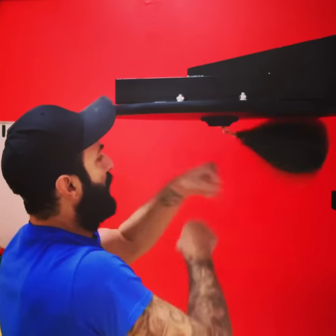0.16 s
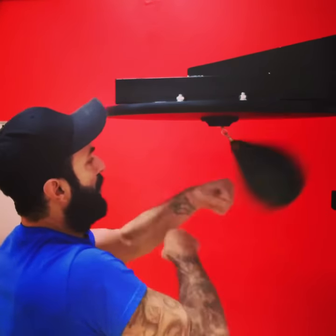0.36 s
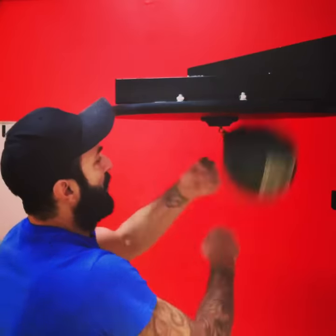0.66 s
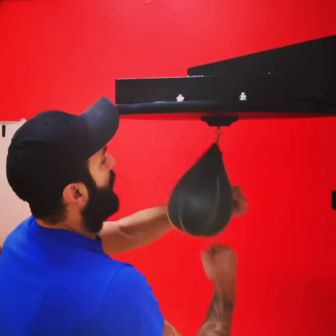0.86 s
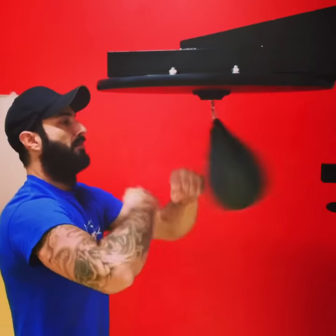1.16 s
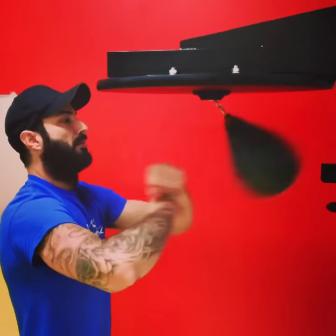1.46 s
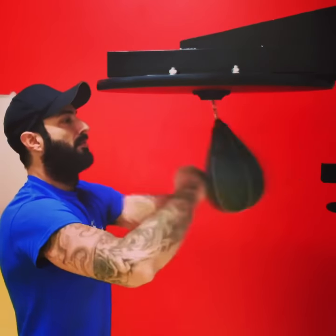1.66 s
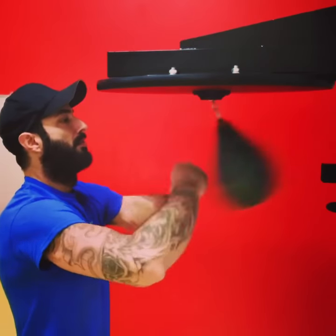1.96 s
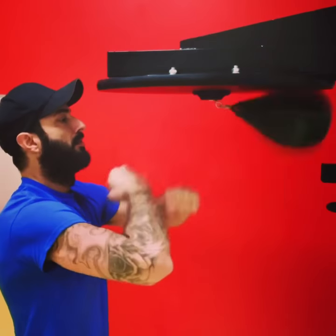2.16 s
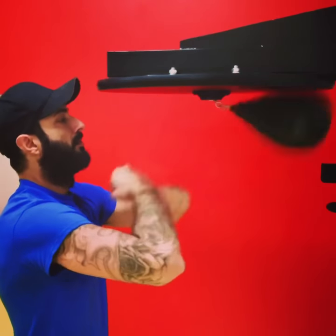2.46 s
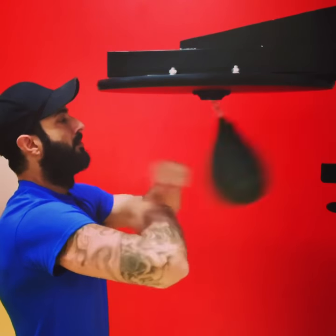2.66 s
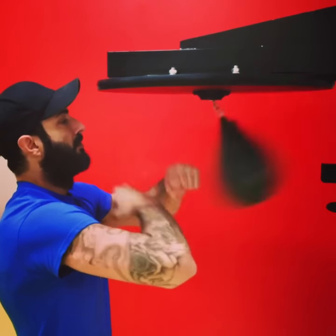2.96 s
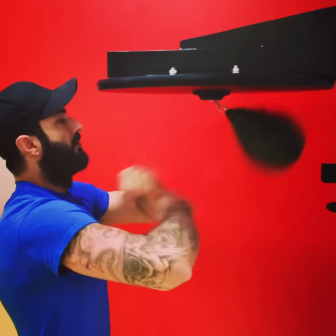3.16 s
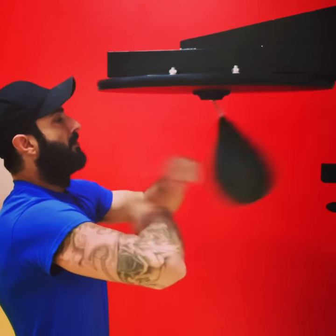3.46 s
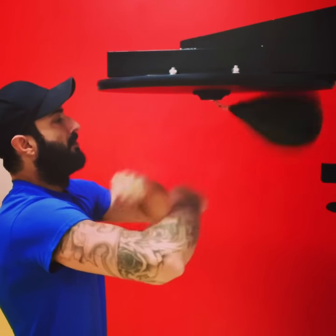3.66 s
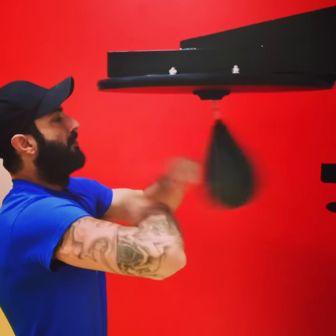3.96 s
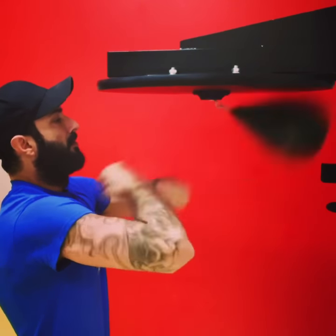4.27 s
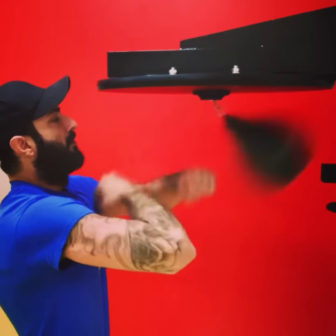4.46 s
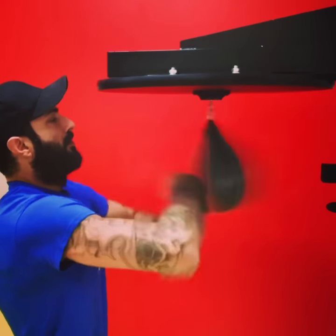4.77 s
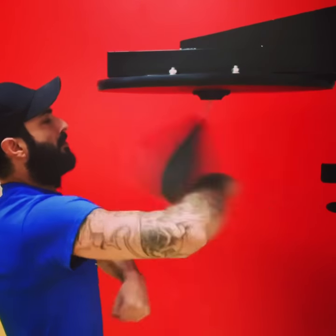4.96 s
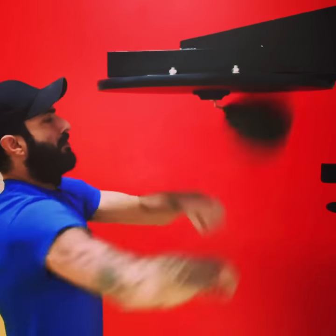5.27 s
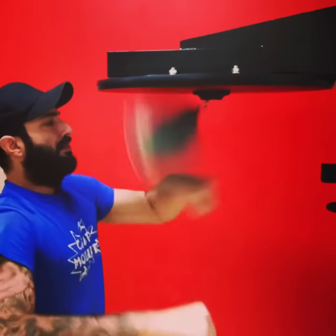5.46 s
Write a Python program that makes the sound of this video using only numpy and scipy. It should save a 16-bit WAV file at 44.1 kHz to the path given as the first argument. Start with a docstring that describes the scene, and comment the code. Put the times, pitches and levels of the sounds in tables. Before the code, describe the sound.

Rapid rolling speed bag workout: sharp fist slaps alternate with woody board cracks, clattering hardware and low platform booms, growing quicker and louder.

```python
"""In a small gym, a leather speed bag is punched in a quickening roll under a wall-mounted platform. A fist
meets the bag about halfway between rebounds, with a slap, a knock and a push through the swivel. On the board
the bag gives a noise-burst crack, a damped knock, a thud and a decaying noise clatter, and excites the low
modes of the platform. Snap, clatter and boom follow the boxer's effort. A bracket clangs once at the start, and
now and then a brief high ring sounds."""
import sys
import numpy as np
from scipy import signal
from scipy.fft import rfft, irfft, next_fast_len
from scipy.io import wavfile

SR = 44100
rng = np.random.default_rng(int(sys.argv[2]) if len(sys.argv) > 2 else 0)


def persist_wave(psi):
    """Save psi, clipped to +-1, as 16-bit WAV."""
    counts = np.round(np.clip(psi, -1, 1) * 32767).astype(np.int16)
    wavfile.write(sys.argv[1], SR, np.atleast_2d(counts).T)


N = 247401
LEAD = 4410  # samples of run-in before time zero
SPAN = next_fast_len(N + LEAD + SR // 2)

# drive on the bag, which sags, then builds as the roll quickens: (time [s], level [dB])
EFFORT = [(0, 1.5), (0.35, -5), (1.2, -9), (2.1, -3.5), (3.3, -2), (4.1, 2.5), (4.45, -1), (5.6, 7)]
# bag meets board: (time [s], clatter accent over effort [dB], extra leather snap, high when flat [dB],
# weight of the boom over effort [dB], strength of the knock [dB])
REBOUNDS = [(-0.02, -0.5, 0, -6.5, -9), (0.0768, -2, 3.5, -1, -12), (0.308, -3.5, -0.5, -8.5, -8),
            (0.4343, 0, 3.5, 1, -15), (0.5849, -3.5, -17, 1, -14), (0.699, 1, 7.5, 3.5, -6),
            (0.848, -2, -39, -5, -21), (1.011, -2, -15, -1, -14), (1.195, 1, 6, 0, -6.5),
            (1.363, 1, 5, 0.5, -7.5), (1.5304, -4.5, -2, 3.5, -6), (1.6821, 2, -1, 1.5, -8),
            (1.8281, 2, 9, 2.5, -9), (1.9735, 2.5, 0, -0.5, -3.5), (2.125, 1, 9, 1, -7.5),
            (2.2683, -4.5, -3, 3, -2.5), (2.416, 2, -9, -0.5, 1), (2.5615, 0, 4, -0.5, 0.5),
            (2.7, -4, -10, 2.5, 0), (2.8292, 2, 9.5, 1.5, 3.5), (2.9646, -1, -4, 2.5, 3.5),
            (3.1, 1, 5.5, 2, -1.5), (3.2357, 3.5, -5, -0.5, -4.5), (3.3631, -1, 7, -2.5, -1.5),
            (3.4901, 1, 9.5, 2, 0), (3.619, 0.5, -3, -4.5, 5.5), (3.7449, -2.5, -8, 1, -3.5),
            (3.8666, 1, 3.5, 1, 3), (3.9791, 2, 5.5, 1.5, 5), (4.0953, 1.5, 6.5, 1, 3.5),
            (4.2139, 3, 6.5, 3, -1), (4.337, -2, 2.5, 0.5, 2), (4.4456, 4, 4, 4.5, 1.5),
            (4.5524, 2.5, 5, 0.5, 1), (4.652, -3.5, -1.5, 3, -1), (4.7597, 4, 2, 2.5, -8),
            (4.859, 0.5, 1, -2.5, 0), (4.954, 4.5, 6, 2.5, 4.5), (5.0496, -1, 0, 0, -7),
            (5.1383, -2, -5, 3.5, 3), (5.2324, -3, 2, -3.5, 2.5), (5.3393, -6.5, 2, -10.5, 1),
            (5.4351, 0, -2, 2, -7), (5.5313, -4.5, 2, -3, -10)]
# fist meets bag, squarely or with a light touch: (time [s], slap level [dB])
PUNCHES = [(0.1909, 17.5), (0.3781, 11), (0.6489, 8.5), (0.795, 13.5), (0.9311, 17), (1.1082, 12),
           (1.291, 10.5), (1.457, 11.5), (1.6172, 13.5), (1.7651, 12), (1.9049, 19), (2.0575, 10),
           (2.203, 19.5), (2.3462, 12), (2.4936, 20), (2.6366, 16), (2.769, 17.5), (2.9021, 12.5),
           (3.035, 17.5), (3.1743, 12.5), (3.3004, 9), (3.4349, 13.5), (3.5603, 18), (3.6899, 12),
           (3.8113, 14), (3.93, 11), (4.0426, 14), (4.1557, 16.5), (4.277, 8), (4.397, 10), (4.4979, 11),
           (4.6092, 18.5), (4.7194, 21), (4.9171, 19.5), (5.1029, 21), (5.189, 24.5), (5.4009, 21.5),
           (5.5891, 23.5)]
# brief rings near 1.6 kHz after some blows: (time [s], level [dB])
RINGS = [(1.342, -22), (3.1, -13), (4.608, -11.5)]

# spectrum of the leather on the board: (frequency [Hz], gain [dB])
SNAP_SPECTRUM = [(1000, -53), (4000, 1), (7000, -4.5), (9500, 11.5), (14500, -1.5)]
# spectrum of the fist on the leather: (frequency [Hz], gain [dB])
SLAP_SPECTRUM = [(300, -27), (1500, -8), (2600, -29.5), (6500, -24), (9500, -14), (14500, -16.5),
                 (16500, -29)]
# spectrum of the rattling rig: (frequency [Hz], gain [dB])
CLATTER_SPECTRUM = [(25, -9), (60, 21), (200, 4.5), (330, 10), (480, 2), (1000, 0), (2600, -5.5),
                    (6000, -6), (8500, -20.5), (14000, -8), (16500, -29)]
# share of the clatter that repeats from rebound to rebound: (frequency [Hz], share [0-1])
REPEATED_SHARE = [(100, 0.22), (600, 0.81), (4000, 0.95), (12000, 0.07)]
# room reverberation: (frequency [Hz], 60 dB decay time [s])
ROOM_T60 = [(300, 1), (1000, 0.77), (15000, 0.37)]

# ringing of the taut bag: (frequency [Hz], level [dB], 60 dB decay time [s])
BAG_MODES = [(545, -13, 0.028), (1493, -2, 0.0078), (3720, -7.5, 0.0067)]
# woody resonances of the board: (frequency [Hz], gain [dB])
BOARD_RESONANCES = [(538, 0), (770, 1), (913.7, 1.5), (1085, -1), (1374, -1.5), (1705, 2), (2880, -19)]
# low modes of platform, bracket and wall: (frequency [Hz], 60 dB decay time [s], signed coupling [ratio])
PLATFORM_MODES = [(63.3, 0.13, -1.48), (75.5, 0.42, 1), (94.17, 1, 0.4), (116.7, 0.63, 0.64),
                  (138.1, 0.22, -0.89), (147.1, 0.47, -0.22), (225.6, 0.91, 0.15), (254, 0.35, -0.13),
                  (287.3, 0.59, -0.21), (323.7, 0.83, 0.2), (334.3, 0.95, -0.15), (361, 0.82, 0.13)]
# modes of the bracket: (frequency [Hz], level [dB], 60 dB decay time [s])
BRACKET_MODES = [(322, 4.5, 0.22), (880, -3, 0.2), (1060, 0, 0.19), (2160, -5.5, 0.13)]

# microphone pair, balance: (frequency [Hz], left minus right [dB])
PORT_BALANCE = [(60, 4), (130, 0), (380, 0), (600, -8), (950, -9), (1600, -5), (2400, 0)]
# microphone pair, correlation: (frequency [Hz], likeness [0-1])
PORT_LIKENESS = [(600, 0.83), (1100, 0.0059), (6500, 0.1), (8200, 0.98)]
# microphone pair, phase: (frequency [Hz], lead of left over right [rad])
PORT_PHASE = [(40, -.2), (130, -.55), (300, -1.1), (700, -2.6), (6500, -7.6), (9500, -9.5), (14000, -12.6)]

# levels at an effort of 0 dB, before each rebound's own offset
SNAP_DB, CLATTER_DB, BOOM_DB = -3.5, -16, -18
# a punch's knock and push grow with effort [dB per dB] up to this effort [dB], then level off
FULL_EFFORT_DB, GROWTH_PER_EFFORT = 1.2, 1.14
# reference level of all knocks, and of a punch's push at full effort
KNOCK_DB, SWIVEL_PUSH_DB = -7, -12
# knuckle knock against the slap [dB]; push per slap [dB per dB]
KNUCKLE_DB, PUSH_PER_SLAP = -24, 0.092
KNOCK_ROUGHNESS = 0.45  # energy share of leather flutter in a knock
WOOD_Q = 79
ECHO_S = 0.0043
# delay and pitch of the thud; its levels against the boom strength of board and fist
THUD_LAG_S, THUD_HZ, BOARD_THUD_DB, FIST_THUD_DB = 0.00951, 307, -2.5, -7.5
CLANG_DB = -21.5
RING_HZ, RING_DECAY_S, RING_RISE_S = 1640, 0.003, 0.00045
CUTOFF_HZ = 16300


def from_db(db):
    """Amplitude ratio: 20 dB is a factor of ten."""
    return 10 ** (np.asarray(db) / 20)


def at_hz(points, hz):
    """Interpolation along a logarithmic frequency axis."""
    f, value = np.transpose(points)
    return np.interp(np.log(np.maximum(hz, 1)), np.log(f), value)


def filtered(x, response):
    """Linear filtering: the spectrum is multiplied by a response given as a function of Hz."""
    size = next_fast_len(x.shape[-1])
    spectrum = rfft(x, size) * response(np.fft.rfftfreq(size, 1 / SR))
    return irfft(spectrum, size)[..., :x.shape[-1]]


def pair(a, b):
    """Partial coherence: mid and side mixtures of two unrelated signals set the likeness of left and right."""
    def likeness(hz):
        return np.clip(at_hz(PORT_LIKENESS, hz), 0, 1)
    mid = filtered(a, lambda hz: np.sqrt((1 + likeness(hz)) / 2))
    side = filtered(b, lambda hz: np.sqrt((1 - likeness(hz)) / 2))
    return np.array([mid + side, mid - side])


def placed(times, gains, shapes):
    """Superposition: one scaled shape per event is added on the time line."""
    out = np.zeros(SPAN)
    for s, gain, shape in zip(times, gains, shapes):
        start = LEAD + round(s * SR)
        out[start:start + len(shape)] += gain * shape[:SPAN - start]
    return out


def effort_db(times):
    """Linear interpolation of the drive level in time."""
    return np.interp(times, *np.transpose(EFFORT))


def rebounds():
    """Snap, clatter and boom scale with the drive; rows of (time, snap dB, knock dB, clatter dB, boom dB)."""
    s, accent_db, flat_db, weight_db, knock_db = np.transpose(REBOUNDS)
    drive_db = effort_db(s)
    snap_db = SNAP_DB + drive_db + flat_db
    clatter_db = CLATTER_DB + drive_db + accent_db
    boom_db = BOOM_DB + drive_db + weight_db
    return np.column_stack([s, snap_db, knock_db, clatter_db, boom_db])


def bursts(count, decay_s, size=900):
    """Leather lands as a spray of tiny contacts: enveloped noise, new for each blow, of unit energy."""
    t = np.arange(size) / SR
    spray = rng.standard_normal((count, size)) * np.sqrt(t) * np.exp(-t / decay_s)
    return spray / np.linalg.norm(spray, axis=1, keepdims=True)


def leather_cracks(times, level_db, spectrum, decay_s):
    """A brief contact radiates a broadband burst, coloured here by the spectrum of the contact."""
    near = pair(*[placed(times, from_db(level_db), bursts(len(times), decay_s)) for _ in range(2)])
    return filtered(near, lambda hz: from_db(at_hz(spectrum, hz)))


def knocks(times, level_db, pitch_scatter, scatter_db, size=1500):
    """A struck taut bag rings in damped modes; pitch and balance vary with how it lands."""
    t = np.arange(size) / SR
    out = 0
    for k, (hz, db, t60) in enumerate(BAG_MODES):
        pitch, strength = rng.standard_normal((len(times), 2)).T
        mode_hz = hz * np.exp(pitch_scatter * pitch[:, None])
        ring = np.sin(2 * np.pi * mode_hz * t) * np.exp(-np.log(1000) * t / t60)
        # leather flutter: the ring is re-excited by a spray of contacts
        flutter = signal.fftconvolve(ring, bursts(len(times), decay_s=0.0018), axes=1)[:, :size]
        ring = np.sqrt(1 - KNOCK_ROUGHNESS) * ring + np.sqrt(KNOCK_ROUGHNESS) * flutter
        gains = from_db(KNOCK_DB + level_db + db + scatter_db * strength)
        out = out - (-1) ** k * placed(times, gains, ring)  # polarity alternates by mode
    return out


def woody(x):
    """Resonance: the direct sound is joined by the board's sharply tuned responses."""
    def response(hz):
        return 1 + sum(from_db(db) / (1 + 2j * WOOD_Q * (hz / centre - 1)) for centre, db in BOARD_RESONANCES)
    return 0.69 * filtered(x, response)


def reflected(x, echo_db):
    """A single reflection off the nearest surface adds a delayed, weaker copy."""
    return filtered(x, lambda hz: 1 + from_db(echo_db) * np.exp(-2j * np.pi * hz * ECHO_S))


def flicker(width_s, size=32):
    """Low-passed noise is a slow random wobble, here of spread 1 with bumps lasting about width_s."""
    coarse = rng.standard_normal(SPAN // size + 1)
    wobble = filtered(coarse, lambda hz: np.exp(-(hz * width_s / size) ** 2))
    return np.interp(np.arange(SPAN) / size, np.arange(len(wobble)), wobble / wobble.std())


def clatter(board, fist, fist_db, fist_bright_db, sting, early, early_s, rise_s, variety_db, grain_s, grain_db,
            size=22000):
    """Blows excite rig and room; the decaying noise in each band is partly repeated, partly new."""
    t, hz = np.arange(size) / SR, np.fft.rfftfreq(SPAN, 1 / SR)
    white = rfft(rng.standard_normal((2, SPAN)))
    fresh, repeated = 0, 0
    edges = [0, 180, 450, 800, 1300, 2000, 3000, 4500, 7000, 11000, 22050]  # Hz
    for low, high in zip(edges, edges[1:]):
        centre = (low + high) / 2
        # separate rattles and reflections make each band lumpy
        lumps = from_db(grain_db * flicker(grain_s))
        lumps = lumps / np.sqrt(np.mean(lumps ** 2))
        band = white * (hz >= low) * (hz < high) * from_db(at_hz(CLATTER_SPECTRUM, hz))
        noise = irfft(band, SPAN) * lumps
        # dense early rattle, slower to build in the bass; the room's tail dies faster in the treble
        buildup = 1 - np.exp(-t / (rise_s * (1 + 1000 / centre)))
        early_rattle = 1 + early * np.exp(-t / early_s)
        decay = buildup * early_rattle * from_db(-60 * t / at_hz(ROOM_T60, centre))
        # a fist excites the rig less than the board does; the sharper the slap, the brighter its tail
        bright_db = fist_bright_db + sting * (fist[:, 1] - fist[:, 1].mean())
        slap_db = fist[:, 1] + fist_db + bright_db * at_hz([(3000, 0.56), (12000, 1.0)], centre)
        slaps = from_db(slap_db + variety_db * rng.standard_normal(len(fist)))
        hits = from_db(board[:, 3] + variety_db * rng.standard_normal(len(board)))
        # the bag always lands on the same spot of the board, so that share of the answer repeats
        same = np.clip(at_hz(REPEATED_SHARE, centre), 0, 1)
        answer = noise[:, -size:] * decay
        answer *= noise.std() * np.linalg.norm(decay) / np.linalg.norm(answer, axis=1, keepdims=True)
        impulses = placed(board[:, 0], np.sqrt(same) * hits, np.ones((len(hits), 1)))
        repeated = repeated + rfft(answer, SPAN) * rfft(impulses)
        # unrelated answers add in power
        times = np.r_[board[:, 0], fist[:, 0]]
        powers = np.r_[(1 - same) * hits ** 2, slaps ** 2]
        fresh = fresh + noise * np.sqrt(placed(times, powers, [decay ** 2] * len(times)))
    return pair(*(fresh + irfft(repeated, SPAN)))


def boom(board, fist, board_lag_s, fist_lag_s, soft_hz, scatter_db, hardening):
    """Forced damped modes: the squashing bag drives the platform, a fist more softly through the swivel."""
    def pushes(rows, lag_s, hz):
        level_db = rows[:, -1]
        # a harder blow is a shorter contact: it favours the higher modes
        tilt_db = hardening * (level_db - level_db.mean()) * np.clip(np.log2(hz / 95), -1, .5)
        strength = from_db(level_db + tilt_db + scatter_db * rng.standard_normal(len(rows)))
        return placed(rows[:, 0] + lag_s, strength, np.ones((len(rows), 1)))

    out = 0
    soft = np.exp(-2 * np.pi * soft_hz / SR)
    for hz, t60, coupling in PLATFORM_MODES:
        fist_pushes = pushes(fist, fist_lag_s, hz) + 1e-18  # tiny offset keeps the filter state nonzero
        softened = signal.lfilter([(1 - soft) ** 2], [1, -2 * soft, soft ** 2], fist_pushes)
        force = pushes(board, board_lag_s, hz) + softened
        r, w = from_db(-60 / (t60 * SR)), 2 * np.pi * hz / SR  # decay and phase step per sample
        out = out + coupling * signal.lfilter([0, np.sin(w)], [1, -2 * r * np.cos(w), r * r], force)
    # the platform is too small to radiate the deepest bass
    return filtered(out, lambda hz: from_db(at_hz([(20, -40), (42, -1.0), (60, -1.5)], hz)))


def thuds(rows, gain_db, size=600):
    """Displaced air: one rounded pressure pulse is centred on the deepest squash of the bag."""
    u = (np.pi * THUD_HZ * (np.arange(size) - size / 2) / SR) ** 2
    pulse = (1 - 2 * u) * np.exp(-u)
    starts = rows[:, 0] + THUD_LAG_S - size / 2 / SR
    return placed(starts, from_db(rows[:, -1] + gain_db), [pulse] * len(rows))


def clang(size=12000):
    """Free vibration: the steel bracket rings once at time zero as a sum of decaying modes."""
    t = np.arange(size) / SR
    ring = sum(from_db(db - 60 * t / t60) * np.sin(2 * np.pi * hz * t) for hz, db, t60 in BRACKET_MODES)
    return placed([0], [from_db(CLANG_DB)], [ring])


def shortfall_db(times):
    """Saturating growth: how far a gentle swing stays below a full one."""
    return GROWTH_PER_EFFORT * np.minimum(effort_db(times) - FULL_EFFORT_DB, 0)


def fist_contacts():
    """One impact excites leather and swivel together; rows of (time, slap dB, boom dB)."""
    s, slap_db = np.transpose(PUNCHES)
    push_db = SWIVEL_PUSH_DB + shortfall_db(s) + PUSH_PER_SLAP * (slap_db - slap_db.mean())
    return np.column_stack([s, slap_db, push_db])


def rings(pitch_scatter=0.066, size=2500):
    """A short ring near 1.6 kHz: a brief tone swells and dies, its pitch varying from ring to ring."""
    s, level_db = np.transpose(RINGS)
    t = np.arange(size) / SR
    pitches = RING_HZ * (1 + pitch_scatter * rng.standard_normal((len(s), 1)))
    envelope = (1 - np.exp(-t / RING_RISE_S)) * np.exp(-t / RING_DECAY_S)
    return placed(s, from_db(level_db), np.sin(2 * np.pi * pitches * t) * envelope)


def scene():
    """Superposition of all sources, with level and phase differences between two close microphone ports."""
    board, fist = rebounds(), fist_contacts()
    snap = leather_cracks(board[:, 0] + 0.0012, board[:, 1], SNAP_SPECTRUM, decay_s=0.00011)
    slap = leather_cracks(fist[:, 0] + 0.0006, fist[:, 1], SLAP_SPECTRUM, decay_s=0.0004)
    knuckle_db = fist[:, 1] + KNUCKLE_DB + shortfall_db(fist[:, 0])
    knock = knocks(np.r_[board[:, 0], fist[:, 0]] + 0.001179, np.r_[board[:, 2], knuckle_db],
                   pitch_scatter=0.056, scatter_db=1.6)
    rattle = clatter(board, fist, fist_db=-39.5, fist_bright_db=-3.5, sting=0.41, early=1.06, early_s=0.023,
                     rise_s=0.00077, variety_db=1.72, grain_s=0.0023, grain_db=3.0)
    low = boom(board, fist, board_lag_s=0.005814, fist_lag_s=0.00492, soft_hz=124,
               scatter_db=1.68, hardening=0.51)
    low = low + thuds(board, BOARD_THUD_DB) + thuds(fist, FIST_THUD_DB)
    contacts = reflected(snap + woody(knock + slap), echo_db=-17)
    mix = contacts + woody(rattle) + low + rings() + clang()
    sides = np.array([[.5], [-.5]])  # half of each difference to left, half to right

    def ports(hz):
        return from_db(sides * at_hz(PORT_BALANCE, hz)) * np.exp(1j * sides * at_hz(PORT_PHASE, hz))
    return filtered(mix, ports)[:, LEAD:LEAD + N]


def record(dry):
    """Overload flattens peaks beyond full scale; a steep low-pass then removes the top of the treble."""
    overloaded = np.clip(dry, -1, 1)
    return signal.sosfilt(signal.ellip(10, .2, 80, CUTOFF_HZ, fs=SR, output="sos"), overloaded)


dry = scene()
out = record(dry)
persist_wave(out)
```